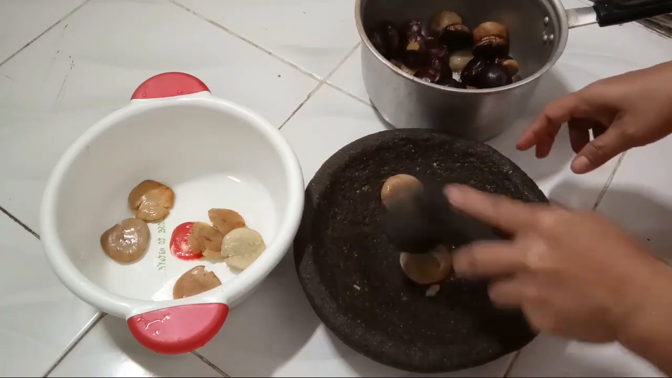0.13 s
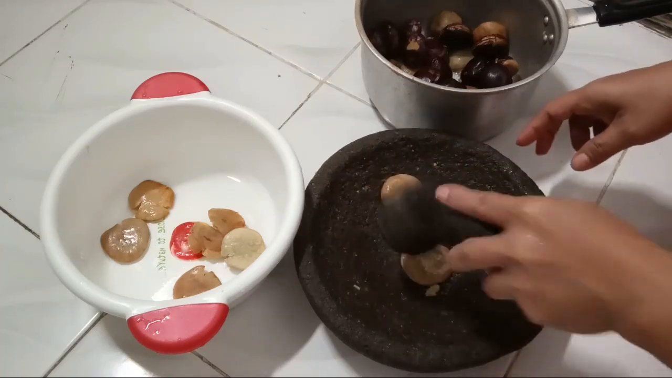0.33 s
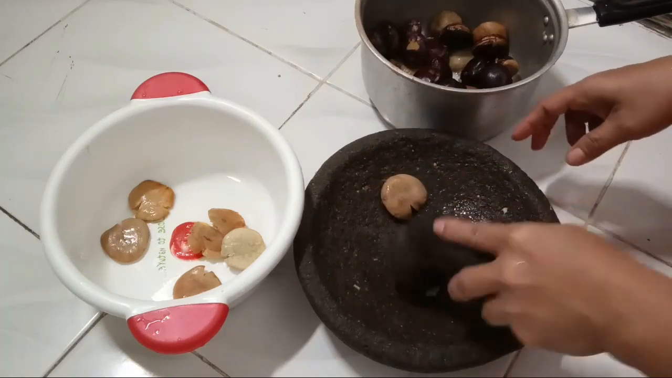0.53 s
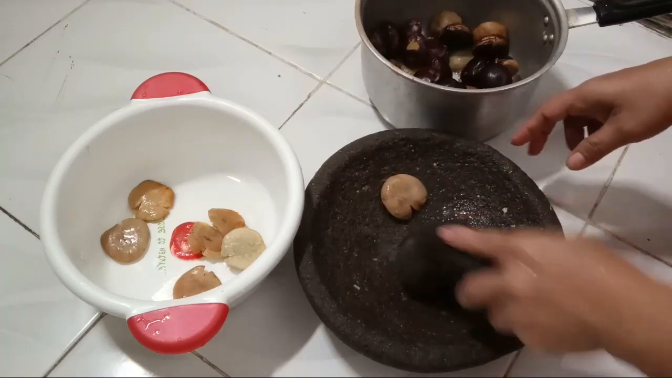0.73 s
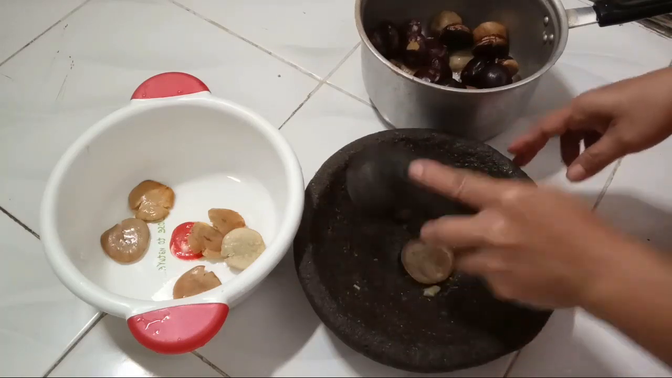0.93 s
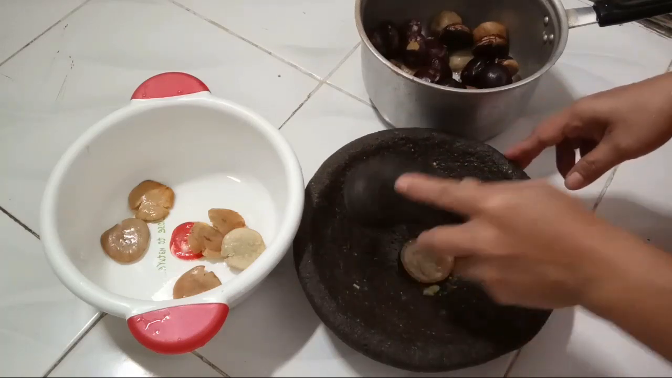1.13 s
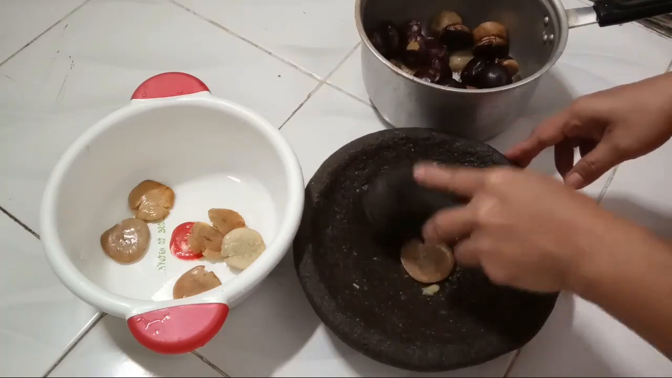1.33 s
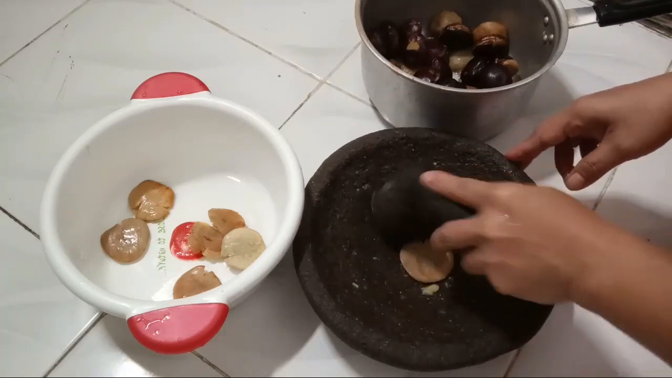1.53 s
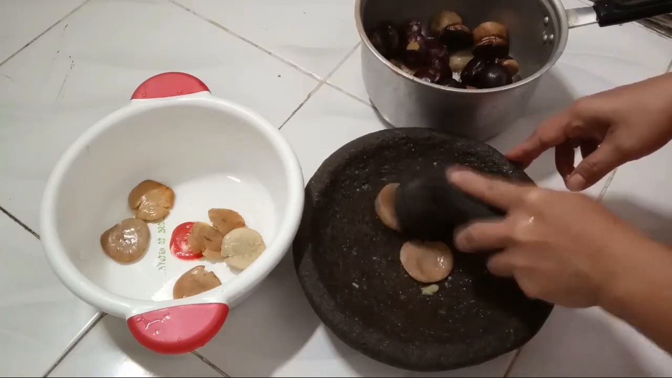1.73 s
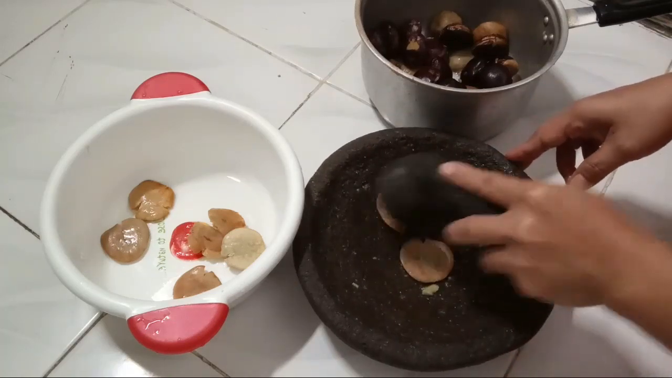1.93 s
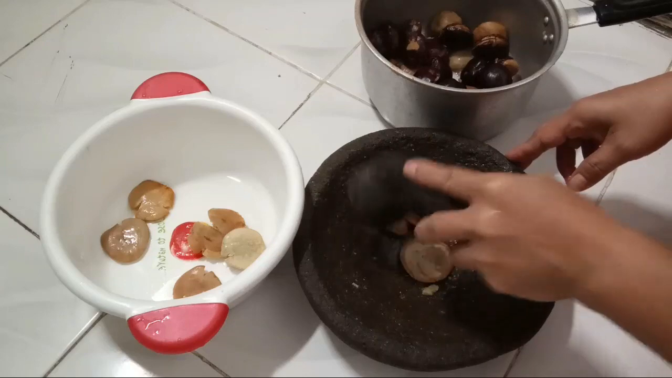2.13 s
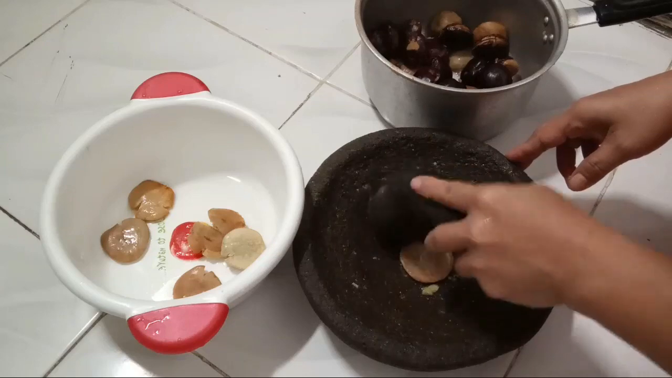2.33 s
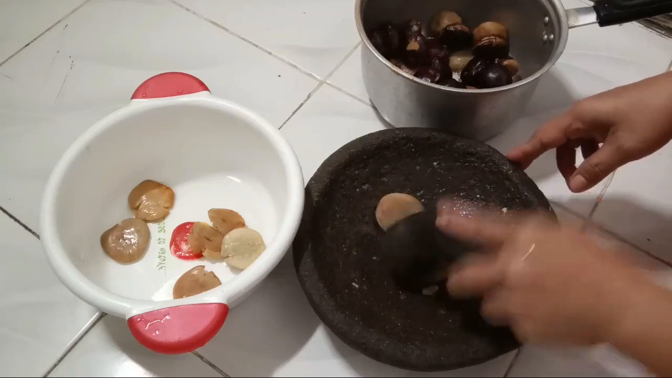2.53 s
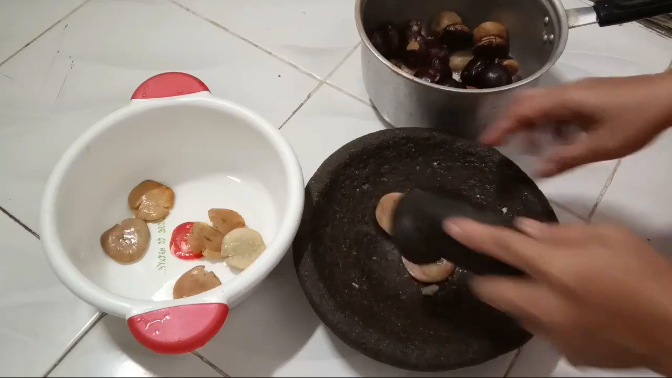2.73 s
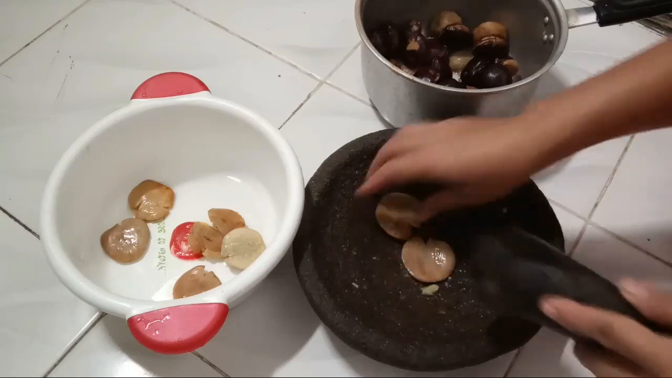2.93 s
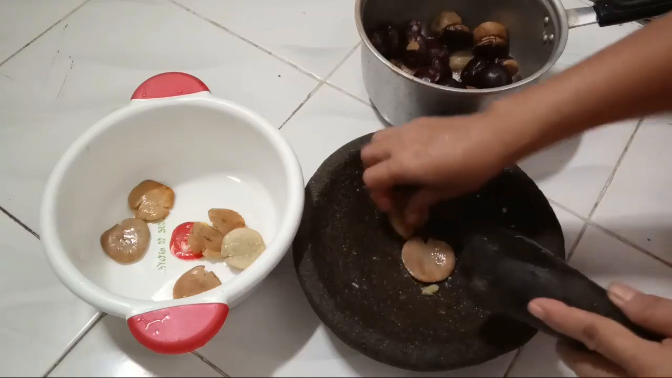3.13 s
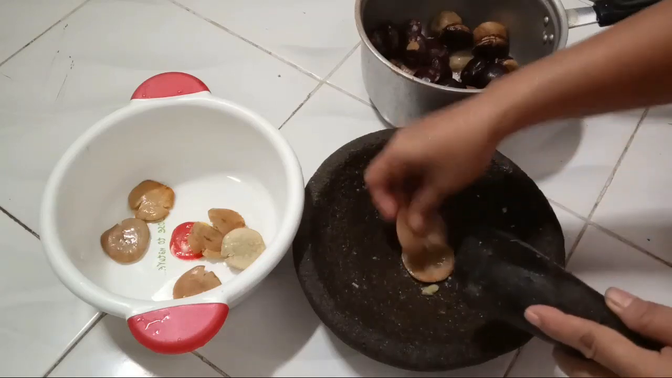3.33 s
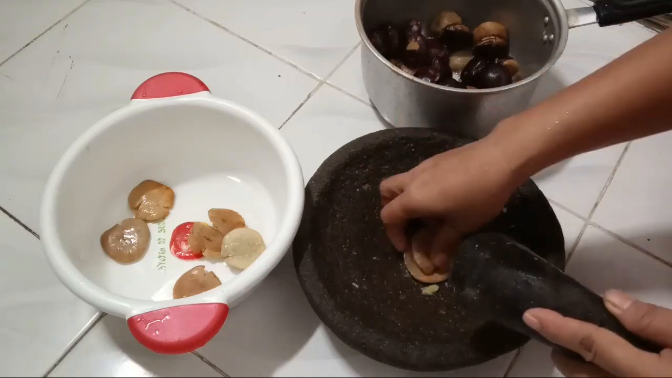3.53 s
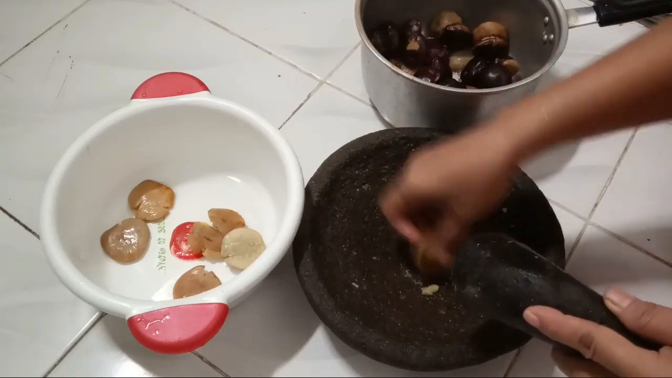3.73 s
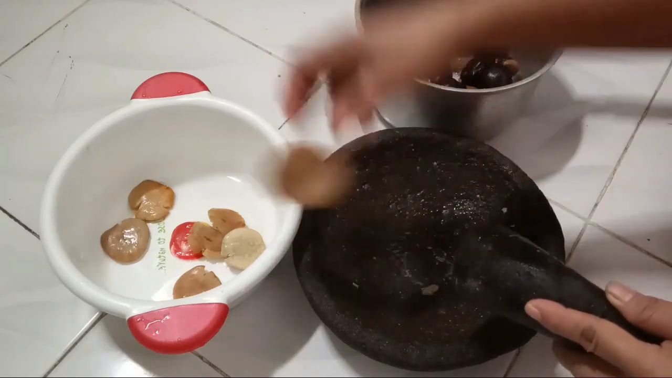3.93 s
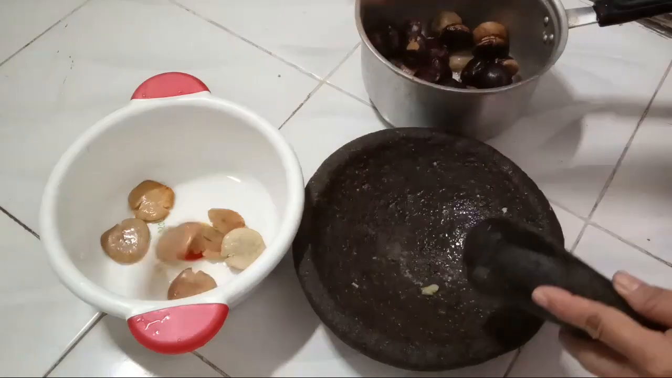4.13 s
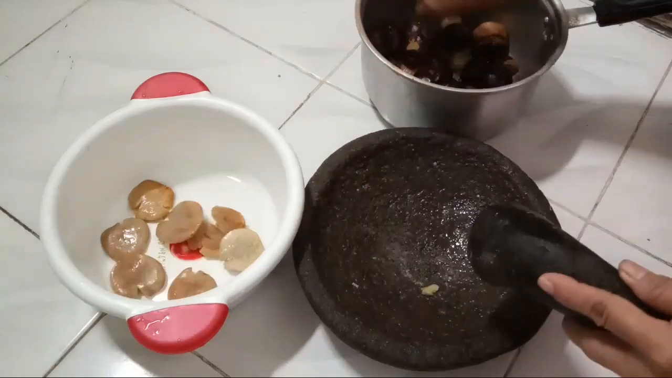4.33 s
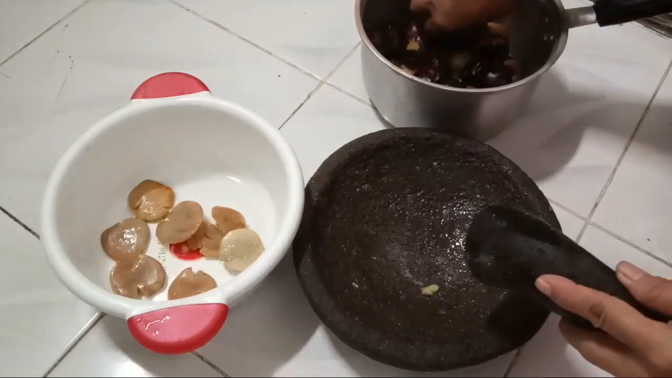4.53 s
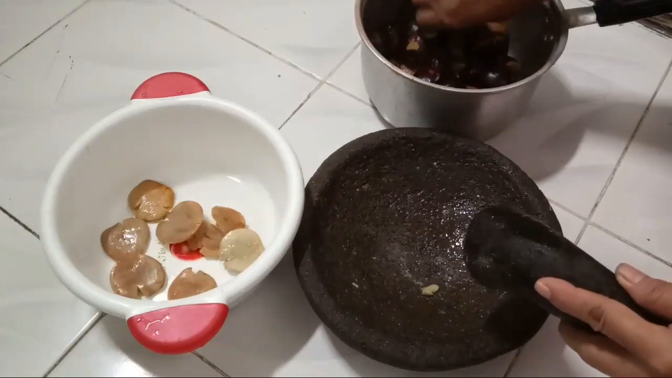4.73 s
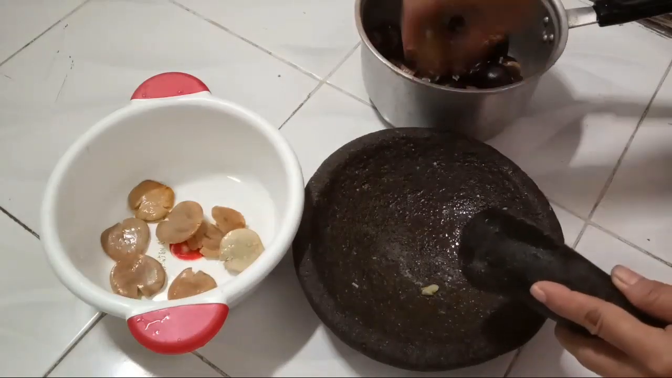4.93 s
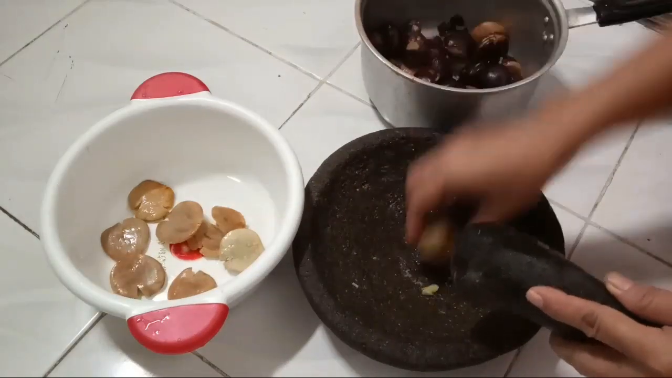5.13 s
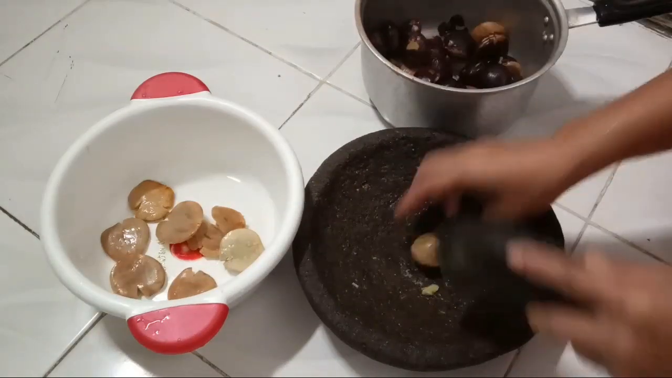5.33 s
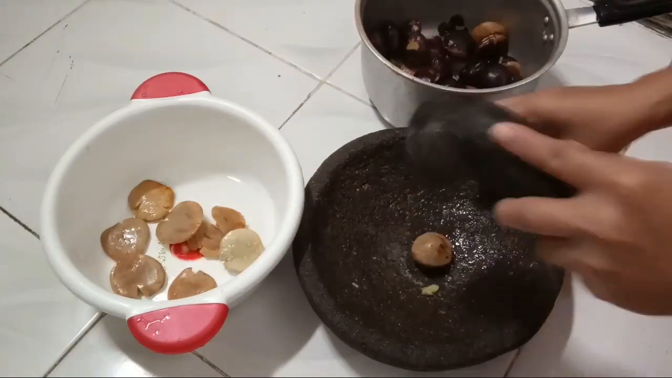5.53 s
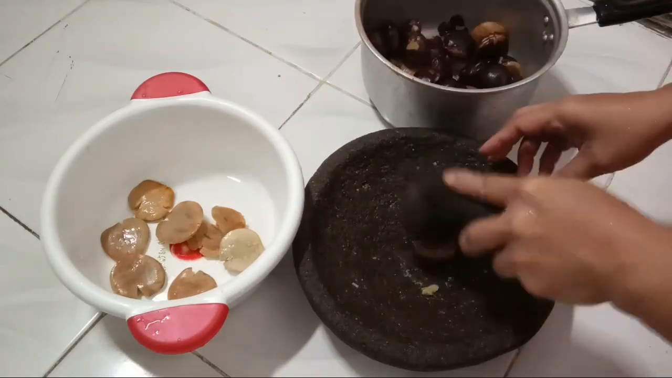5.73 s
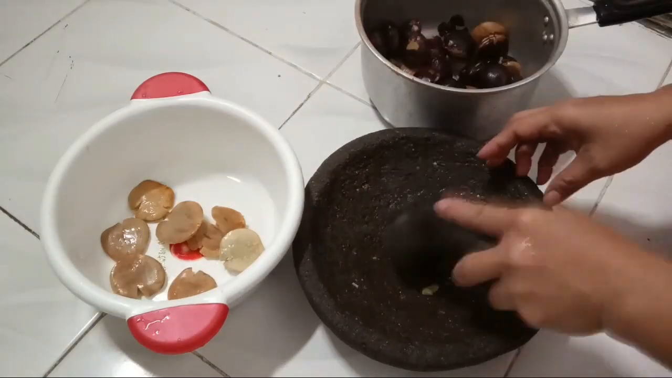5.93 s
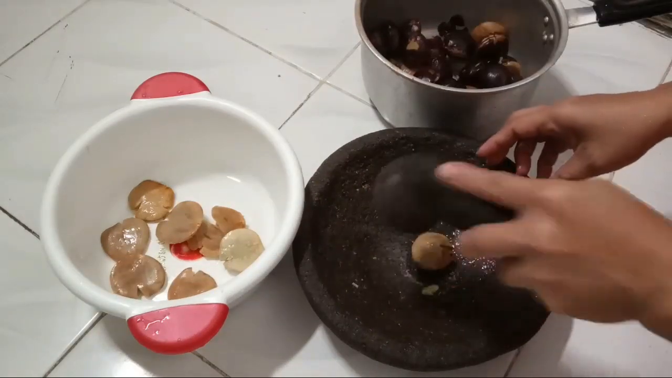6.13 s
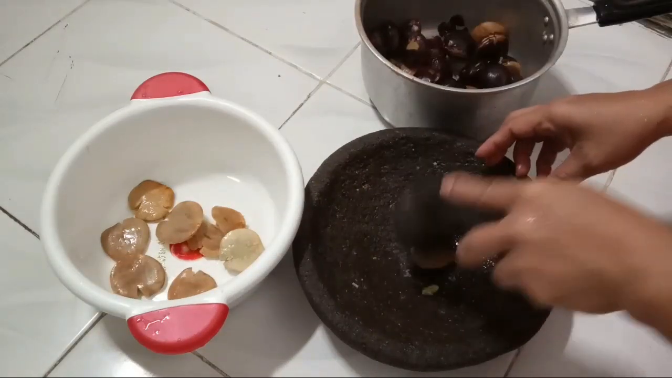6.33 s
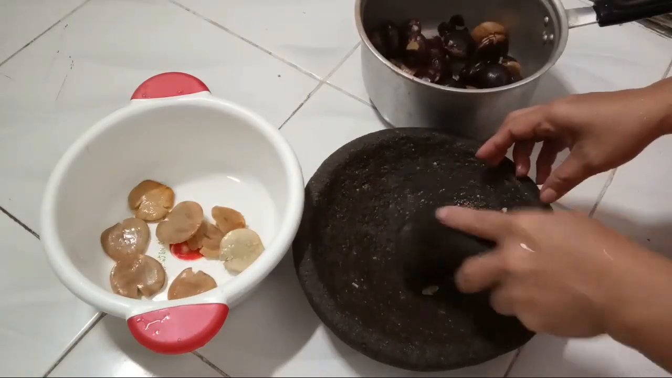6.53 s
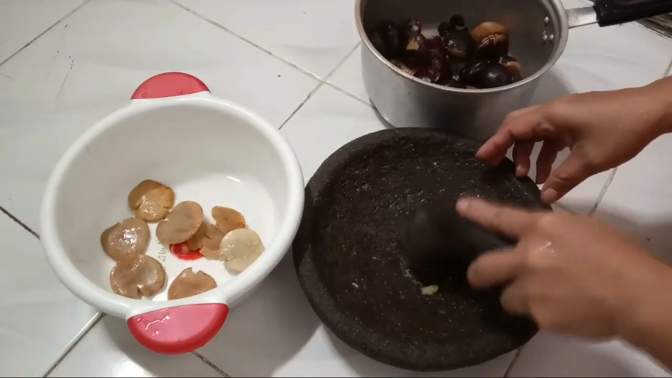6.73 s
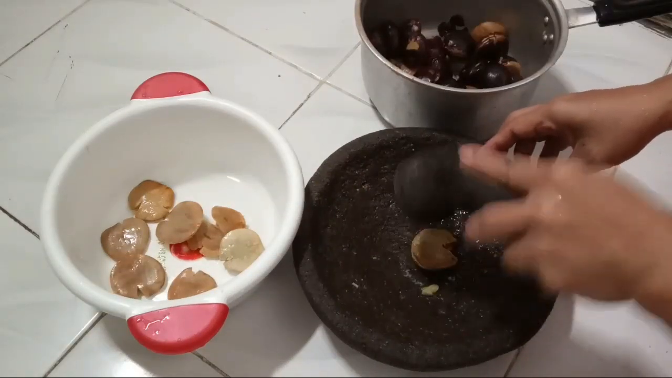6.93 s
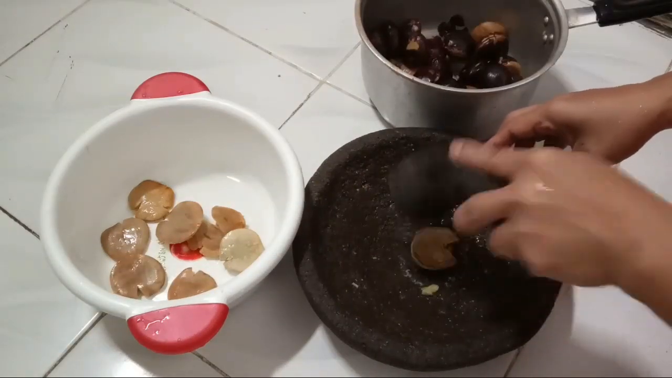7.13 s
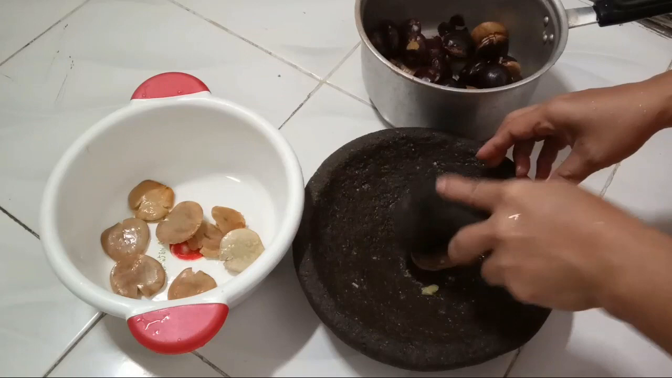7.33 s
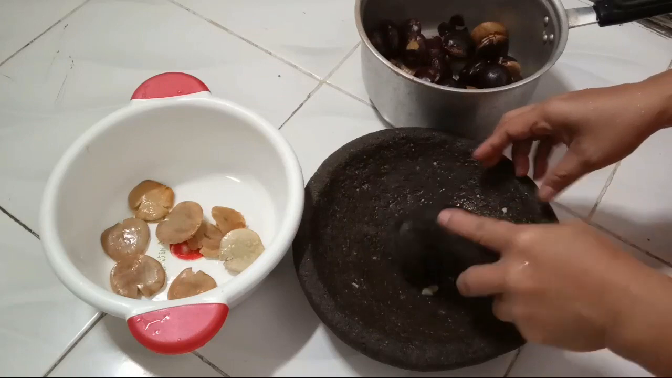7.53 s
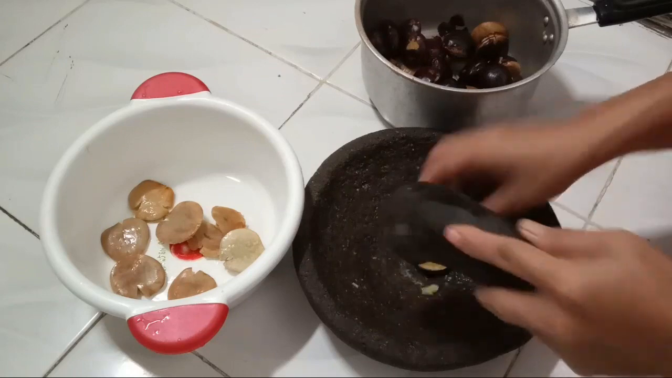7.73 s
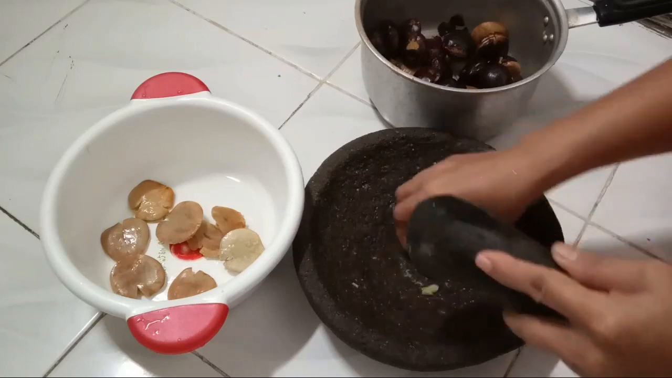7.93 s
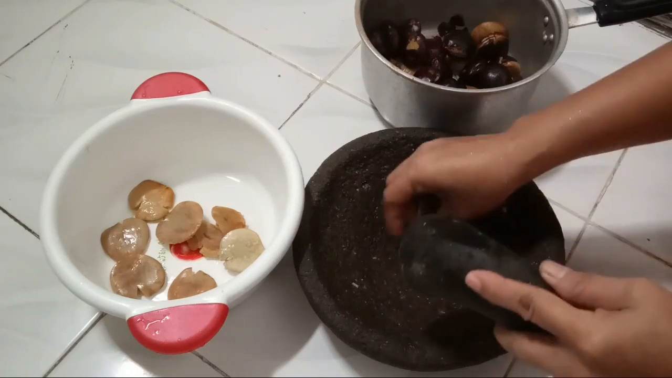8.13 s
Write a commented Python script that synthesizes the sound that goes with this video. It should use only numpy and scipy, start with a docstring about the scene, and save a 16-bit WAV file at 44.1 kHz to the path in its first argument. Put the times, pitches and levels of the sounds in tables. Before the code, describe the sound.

A close microphone in a small, reverberant tiled kitchen with soft air noise and a very faint, wavering appliance hum. From 0 to 2.7 s a stone pestle strikes soft boiled beans in a heavy stone mortar, eleven blows roughly 0.26 s apart: each a deep thud and woody-dull knock with a millisecond burst of crushed pulp and hissing, whistling juice. From 0.3 s many blows are followed about 20 ms later by a gritty, ringing stone clack, hardest near 1.1, 1.4 and 1.6 s. From 2.7 to 5.7 s pounding stops: barely audible finger taps and sticky ticks, a tight cluster of soft slaps in a plastic bowl at 4.2 s, a faint wet smack from the pot at 4.5 s, light bumps at 5.3 and 5.6 s. At 5.74 s a very squelchy blow starts eight more thuds, strongest around 6.6 to 6.85 s, ending at 7.6 s without clacks; then the room is quiet.

```python
"""A hard, tiled kitchen: on its floor a stone pestle pounds soft boiled beans flat in a stone mortar.
Each blow is a noise burst of crushed pulp and squirting juice over a modal thud and knock of the mortar;
some follow through, and bare stone clacks on stone as ringing modes roughened by grain. In the pause chips
slap a plastic bowl (noise into modes) and light touches of band noise mark the fetching of a new bean.
Decaying noise and wall echoes make the room; filtered noise and wavering tones make air and appliance hum."""
import sys
import numpy as np
from scipy import signal
from scipy.fft import rfft, irfft, next_fast_len
from scipy.io import wavfile
from scipy.ndimage import uniform_filter1d, map_coordinates

SR = 44100
rng = np.random.default_rng(int(sys.argv[2]) if len(sys.argv) > 2 else 0)


def unload_wav(signal):
    """Save mono or channel-first audio to the path in sys.argv[1] as 16-bit WAV at rate SR, clipped to [-1, 1]."""
    wavfile.write(
        sys.argv[1],
        SR,
        np.round(np.clip(np.atleast_2d(signal).T, -1, 1) * 32767).astype(np.int16),
    )


N = 360297  # samples in the scene
T = np.arange(24576) / SR  # time axis of one short sound, s

# Blows on a bean: t/s, thud level/dB, pulp crush level/dB, juice squirt level/dB, whistle resonance/dB
BLOWS = [(0.039, -18, -37, -21.5, 27), (0.2877, -19, -34, -25, 6), (0.5467, -16.5, -41, -36, 6),
         (0.7959, -15, -39.5, -37.5, 11), (1.0859, -22.5, -29, -32, 8), (1.352, -18.5, -29.5, -23, 7.5),
         (1.6015, -27.5, -38, -27.5, 8), (1.8525, -23, -41.5, -27.5, 7), (2.1088, -26, -40.5, -31, 2),
         (2.3719, -19, -32, -21.5, 10), (2.662, -18.5, -35.5, -29.5, 16), (5.7449, -25.5, -23, -16.5, 13.5),
         (6.0447, -22.5, -32.5, -31.5, 5), (6.3332, -18.5, -29.5, -30.5, 11),
         (6.5864, -16, -21, -20.5, 8.5), (6.8492, -15, -26.5, -27, 9), (7.099, -19, -34, -29.5, 8),
         (7.3514, -17.5, -33, -26, 7.5), (7.615, -22.5, -43, -36, 10.5)]
# Mortar, floor and walls booming under a soft blow: f/Hz, width/Hz, level/dB
MORTAR_MODES = [(75.7, 9.7, 6.5), (121, 10, 4.5), (159.4, 30, 1.5), (232.1, 8, 9.5), (349.4, 8.6, -1),
                (392, 20, -4.5), (535.3, 44, -0.5), (690, 33, 8), (873, 320, 2.5), (1096, 25, 8),
                (1404, 42, 4.5)]
# Spectra of the weight's thud, the firm knock, the crushed pulp and the squirted juice: f/Hz, level/dB per Hz
THUD_SPECTRUM = [(25, -30.5), (55, -20), (100, -7), (170, 1), (240, 0), (390, 2.5), (520, -4), (900, -26.5),
                 (1800, -58), (4000, -88.5)]
KNOCK_SPECTRUM = [(150, -25), (400, -6), (560, 11), (880, 3.5), (1050, -6.5), (1400, -11.5), (1700, -16.5),
                  (3500, -61), (8000, -87)]
CRUSH_SPECTRUM = [(500, -17.5), (1200, 0), (1850, -3.5), (2300, -1.5), (2800, -3.5), (3400, -1), (4200, -5),
                  (4900, -10), (5600, -5), (7000, -20), (16000, -54)]
SQUIRT_SPECTRUM = [(2000, -29.5), (4800, -14.5), (6300, -2), (8500, 0.5), (10500, -3), (12500, -4),
                   (15500, -2.5)]
# Pestle slipping through the bean onto stone: t/s, level/dB
CLACKS = [(0.3048, -24), (0.5632, -25), (.8116, -20.5), (1.1103, -13), (1.3745, -15), (1.6338, -7.5),
          (1.8657, -15.5), (2.3932, -18.5)]
# Resonances of stone struck by stone: f/Hz, width/Hz, level/dB
STONE_MODES = [(477, 100, 5), (675, 22, 12.5), (777, 81, 9.5), (890, 50, 7), (1000, 25, 12), (1095, 43, 8),
               (1171.5, 5.7, 16.5), (1402, 20, 17), (1398, 39, 19), (1510, 140, 8), (1730, 68, 9.5),
               (1870, 52.5, 12.5), (2223, 180, 14), (3258, 130, 12)]
# Spectrum of the push of stone on stone: f/Hz, level/dB per Hz
STRIKE_SPECTRUM = [(40, -19.5), (150, -5), (400, 6.5), (900, 4), (1500, -0.5), (2200, -12), (3200, -9),
                   (4500, -16), (7500, -3.5), (11000, -9.5), (15000, -5.5)]
# Flat chips landing in the plastic bowl: t/s, level/dB
CHIPS = [(4.21, -40.5), (4.218, -42.5), (4.248, -44.5)]
# Resonances of the bowl: f/Hz, width/Hz, level/dB
BOWL_MODES = [(226, 40, 11.5), (705, 130, 11.5), (1500, 190, 8.5), (2210, 160, 6), (3230, 250, 8)]
# Spectrum of a chip's slap: f/Hz, level/dB per Hz
SLAP_SPECTRUM = [(80, 4), (200, -2), (800, -1), (2000, -10), (3500, -16), (5000, -23), (9000, -24),
                 (15000, -32.5)]
# Sticky paste letting go: t/s, level/dB
TICKS = [(.86, -54), (1.658, -42.5), (1.799, -58), (2.1182, -43), (3.7421, -48), (4.2625, -62),
         (6.1096, -49)]
# Fingers and beans bumping the mortar and the pot: t/s, level/dB, centre f/Hz
TAPS = [(3.073, -58.5, 1780), (3.704, -49.5, 633), (4.367, -55, 1290), (4.433, -63, 4370),
        (4.469, -54.5, 1730), (5.311, -46, 590), (5.579, -55, 925)]
# Decay of the kitchen: f/Hz, t60/s
ROOM_T60 = [(80, 1.1), (210, 0.37), (560, 0.4744), (1470, 0.47), (3880, 0.56), (10200, 0.39), (16000, 0.4)]
# Strength of the kitchen's answer: f/Hz, level/dB
ROOM_DB = [(40, -8.5), (75, 7.5), (120, 5), (200, -2.5), (400, -4), (700, -5.5), (1300, 1.5), (2300, -4),
           (3400, 0.5), (5000, -4.5), (7800, -5), (15000, -7.5)]
# Reflections from near walls: delay t/s, level/dB
WALLS = [(.0052, -14.5), (0.017, -21), (0.0209, -16), (.0255, -27), (0.046, -21.5)]
# Spectrum of the soft room noise: f/Hz, level/dB per Hz
AIR_SPECTRUM = [(25, -16.5), (65, -9.5), (100, -3.5), (250, -9), (300, -5), (500, -15), (1200, -22.5),
                (3300, -26), (4500, -32.5), (5000, -37), (6000, -38), (7600, -30.5), (10000, -41.5),
                (15500, -45.5)]
# Tones of the appliance: f/Hz, level/dB
HUM_TONES = [(96.9, -63), (969, -74), (2320, -77), (3241, -76), (3919, -80), (4355, -80), (6330, -86.5),
             (6620, -87.5), (7741, -81)]

# A thud at FIRM_DB comes with a knock at KNOCK_DB; the knock falls slightly faster as blows get lighter
FIRM_DB, KNOCK_DB, KNOCK_DB_PER_DB = -18, -22.5, 1.02
CRUSH_FALL_S, SQUIRT_FALL_S = 0.0026, 0.0022  # time from peak down to 1/e
CRUSH_EARLY_S, LAND_EARLY_S = 0.0004, 0.0012  # pulp gives and weight lands this long before the squirt peaks
WHISTLE_HZ, WHISTLE_HALF_WIDTH_HZ = 7550, 885  # the gap between pestle and bean
# Level of a hard clack, how high it reaches, and the extra level that doubles that frequency
HARD_DB, BRIGHT_HZ, DB_PER_OCTAVE = -13.5, 1450, 13
REBOUND_S, REBOUND_DB = 0.007, -9  # median flight time; level relative to the first contact
CHIP_T60_S = 0.04
TICK_HZ, TICK_OCTAVES, TICK_T60_S = 8250, 0.33, 0.008
TAP_OCTAVES, TAP_T60_S = 0.65, 0.025
SMACK_S, SMACK_DB = 4.487, -57.5  # a wet bean comes unstuck deep in the pot
TOP_HZ, EDGE_HZ = 15700, 400  # middle and width of the edge at the band limit


def pounding(tail, lead=0.008):
    """Impact on a soft layer: it ruptures and jets for milliseconds while the load excites the mortar's modes."""
    track = np.zeros(N)
    land = lead - LAND_EARLY_S
    pulp = lambda hz: along(CRUSH_SPECTRUM, hz)
    for s, thud_db, crush_db, squirt_db, resonance_db in BLOWS:
        knock_db = KNOCK_DB + KNOCK_DB_PER_DB * (thud_db - FIRM_DB)
        thud_push = struck(THUD_SPECTRUM, MORTAR_MODES, scatter_db=1.0)
        thud = in_kitchen(later(thud_push, land), tail, wet_db=-1.5)
        knock_push = struck(KNOCK_SPECTRUM, MORTAR_MODES, scatter_db=4.0)
        knock = in_kitchen(later(knock_push, land), tail, wet_db=-1.0)
        crush = splat(lead - CRUSH_EARLY_S, CRUSH_FALL_S, pulp, pulp, wet_db=-4.0)

        # juice and air whistle out of the closing gap; the whistle is a beam, so the room returns less of it
        whistle = lambda hz: resonance_db / (1 + ((hz - WHISTLE_HZ) / WHISTLE_HALF_WIDTH_HZ) ** 2)
        beam = lambda hz: along(SQUIRT_SPECTRUM, hz) + whistle(hz)
        around = lambda hz: along(SQUIRT_SPECTRUM, hz) + 0.76 * whistle(hz)
        squirt = splat(lead, SQUIRT_FALL_S, beam, around, wet_db=-1.0)

        bean = amp(crush_db) * crush + amp(squirt_db) * squirt
        # the mortar is pressed away from the air, so its pressure falls first
        mortar = -(amp(thud_db) * thud + amp(knock_db) * knock)
        add(track, s - lead, bean + mortar)
    return track


def clacks(tail, chatter_s=0.0018):
    """Hard contact: stone grinds over its grain, rings and rebounds once; more force reaches higher modes."""
    track = np.zeros(N)
    for s, db in CLACKS:
        bright_hz = BRIGHT_HZ * 2 ** ((db - HARD_DB) / DB_PER_OCTAVE)
        flight = REBOUND_S * np.exp(0.25 * rng.standard_normal())
        first = struck(STRIKE_SPECTRUM, STONE_MODES, scatter_db=2.5)
        second = struck(STRIKE_SPECTRUM, STONE_MODES, scatter_db=0.5)
        contacts = first + amp(REBOUND_DB) * later(second, flight)
        clack = coloured(contacts, lambda hz: -10 * np.log10(1 + (hz / bright_hz) ** 4))

        # rough faces scatter the contact in time: only the phase of the grain is used, so the colour stays
        scrape = rng.standard_normal(len(T)) * np.exp(-T / chatter_s)
        grain = rfft(scrape + signal.unit_impulse(len(T)) * amp(12.0))
        ground = irfft(rfft(clack) * np.exp(1j * np.angle(grain)), len(T))
        ground = ground * (T < T[-1] / 2)  # drop what wrapped round
        add(track, s, in_kitchen(amp(db) * burst(ground), tail, wet_db=-2.5))
    return track


def chips(tail):
    """Excitation and resonator: the brief noise of a wet chip's slap drives the modes of the plastic bowl."""
    track = np.zeros(N)
    for s, db in CHIPS:
        wet_slap = spatter(amp(-60 * T / CHIP_T60_S), spiky_db=3)
        bowl = struck(SLAP_SPECTRUM, BOWL_MODES, scatter_db=1.5)
        slap = signal.fftconvolve(wet_slap, bowl)[:len(T)]
        add(track, s, in_kitchen(amp(db) * burst(slap), tail, wet_db=-0.5))
    return track


def handling(tail):
    """Adhesion and light contact: paste ticks, fingers tap; the smack in the pot arrives mostly by reflection."""
    near = np.zeros(N)
    for s, db in TICKS:
        add(near, s, amp(db) * touch(TICK_HZ, TICK_OCTAVES, TICK_T60_S))
    for s, db, centre_hz in TAPS:
        add(near, s, amp(db) * touch(centre_hz, TAP_OCTAVES, TAP_T60_S))
    track = in_kitchen(near, tail, wet_db=-3.5)
    smack = amp(SMACK_DB) * touch(centre_hz=7570, octaves=0.247, t60=0.03)
    add(track, SMACK_S, in_kitchen(smack, tail, wet_db=14.5))
    return track


def background():
    """Stationary noise and phase-modulated tones: soft room noise, an appliance's unsteady hum and whine."""
    t = np.arange(N) / SR
    air = unit(coloured(rng.standard_normal(N), lambda hz: along(AIR_SPECTRUM, hz)))
    hum = np.zeros(N)
    for hz, db in HUM_TONES:
        rate = np.sqrt(hz)  # random phase points per second: higher tones waver faster
        drift = map_coordinates(rng.standard_normal(int(N * rate / SR) + 4), [t * rate])
        hum += amp(db) * unit(np.sin(2 * np.pi * hz * t + 2.6 * drift))
    return amp(-57.0) * air + hum


def reverberation(build_s=0.0035):
    """Diffuse decay: noise in which each frequency dies at its own speed after a short build-up."""
    hz, t, z = signal.stft(rng.standard_normal(len(T)), SR, nperseg=512)
    t60 = along(ROOM_T60, hz)[:, None]
    decay = amp(along(ROOM_DB, hz)[:, None] - 60 * t / t60)
    equal_energy = np.sqrt(2 * np.log(1000) / (t60 * SR))  # offsets the extra energy of a longer decay
    tail = signal.istft(z * decay * equal_energy, SR, nperseg=512)[1][:len(T)]
    return tail * (1 - np.exp(-T / build_s))


def in_kitchen(x, tail, wet_db, moved=0.8):
    """Superposition of direct sound, near walls and a tail that is partly new each time, as the hands move."""
    response = np.cos(moved) * tail + np.sin(moved) * reverberation()
    for delay, db in WALLS:
        response[round(delay * SR)] += amp(db)
    return x + amp(wet_db) * signal.fftconvolve(x, response)[:len(x)]


def struck(spectrum, modes, scatter_db):
    """Modal response: one push on a body whose resonances answer at slightly new strengths each time."""
    rows = [(centre, width, db + scatter_db * rng.standard_normal()) for centre, width, db in modes]

    def gain_db(hz):
        """Resonance: Lorentzian power peaks stand on the spectrum of the push."""
        peaks = sum(amp(db) ** 2 / (1 + (2 * (hz - centre) / width) ** 2) for centre, width, db in rows)
        return along(spectrum, hz) + 10 * np.log10(1 + peaks)

    return burst(coloured(signal.unit_impulse(len(T)), gain_db))


def splat(centre, fall_s, gain_db, spray_db, wet_db, rise=0.85):
    """Directional radiation: a wet burst sprays differently each way, so the room returns an even hiss."""
    width = fall_s * np.where(T < centre, rise, 1)  # it rises faster than it falls
    envelope = np.exp(-((T - centre) / width) ** 2)
    direct = burst(coloured(spatter(envelope, spiky_db=1.5), gain_db))
    spray = burst(coloured(signal.unit_impulse(len(T), round(centre * SR)), spray_db))
    walls = sum(amp(db) * later(direct, delay) for delay, db in WALLS)
    hiss = signal.fftconvolve(spray, reverberation())[:len(T)]
    return direct + amp(wet_db) * (walls + hiss)


def touch(centre_hz, octaves, t60):
    """Light contact: a short, decaying spatter in one band."""
    band = lambda hz: -12 * np.log10(1 + (np.log2((hz + 1) / centre_hz) / octaves) ** 4)
    return burst(coloured(spatter(amp(-60 * T / t60), spiky_db=5), band))


def spatter(envelope, spiky_db):
    """Random rupture: noise made of tiny breaks of uneven size."""
    sizes = unit(uniform_filter1d(rng.standard_normal(len(T)), size=12))
    return envelope * amp(spiky_db * sizes) * rng.standard_normal(len(T))


def coloured(x, gain_db):
    """Minimum-phase filtering: a causal response built from a gain in dB as a function of frequency."""
    m = 2 * next_fast_len(len(x), True)
    cepstrum = irfft(np.log(amp(gain_db(np.fft.rfftfreq(m, 1 / SR))) + 1e-6))
    # folding the cepstrum onto positive times makes the filter causal
    cepstrum[1:m // 2] *= 2
    cepstrum[m // 2 + 1:] = 0
    return irfft(rfft(x, m) * np.exp(rfft(cepstrum)))[:len(x)]


def along(points, hz):
    """Logarithmic frequency scale: interpolate (f/Hz, value) points on it."""
    f, v = np.transpose(points)
    return np.interp(np.log(hz + 1), np.log(f), v)


def amp(db):
    """Level to amplitude ratio: 20 dB is a factor of ten."""
    return 10 ** (np.asarray(db) / 20)


def unit(x):
    """Effective value: scale to rms 1."""
    return x / np.sqrt(np.mean(x ** 2) + 1e-20)


def burst(x):
    """Signal energy: scale a short sound to the energy of a hundredth of a second at rms 1."""
    return x / np.sqrt(np.sum(x ** 2) * 100 / SR + 1e-20)


def later(x, s):
    """Propagation delay: x delayed by s seconds."""
    return np.pad(x, (round(s * SR), 0))[:len(x)]


def add(track, s, x):
    """Superposition: mix x into the track from time s."""
    i = round(s * SR)
    track[i:i + len(x)] += x[:N - i]


def scene():
    """Superposition: all sources sound in the same small kitchen."""
    tail = reverberation()
    return (pounding(tail) + clacks(tail) + handling(tail) + chips(tail) + background())[None]


def record(dry, ceiling=0.8, low_hz=60):
    """Band limiting and soft saturation: thin deep bass, rounded highest peaks, nothing above the top edge."""
    thin = signal.sosfilt(signal.butter(2, low_hz, "highpass", fs=SR, output="sos"), dry)
    rounded = thin / (1 + np.abs(thin / ceiling) ** 6) ** (1 / 6)
    m = next_fast_len(N + SR)
    edge = np.clip((TOP_HZ - np.fft.rfftfreq(m, 1 / SR)) / EDGE_HZ + 0.5, 0, 1)
    return irfft(rfft(rounded, m) * edge, m)[:, :N]


dry = scene()
out = record(dry)
unload_wav(out)
```